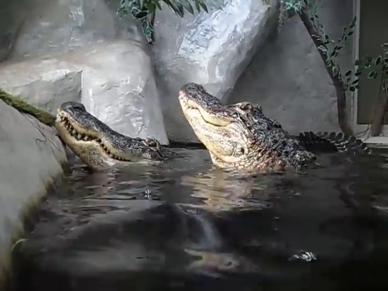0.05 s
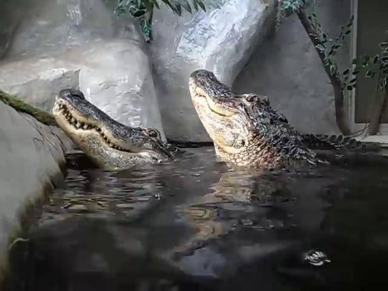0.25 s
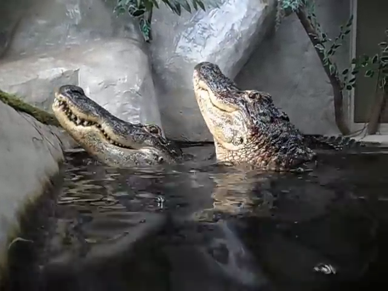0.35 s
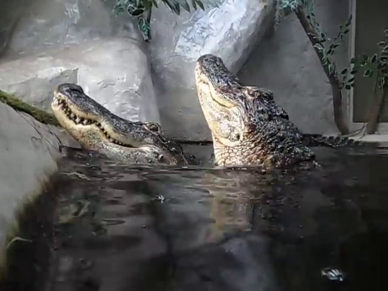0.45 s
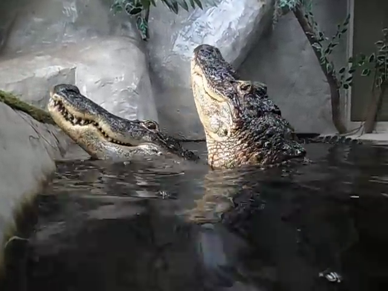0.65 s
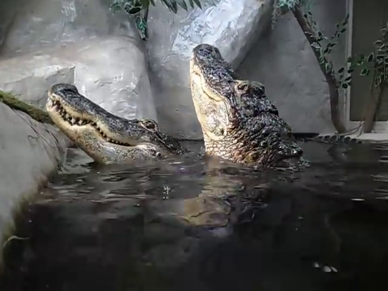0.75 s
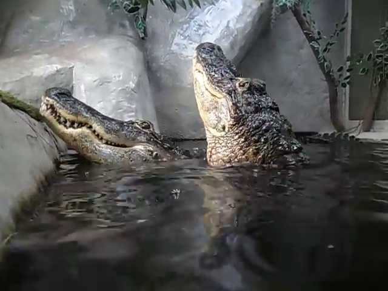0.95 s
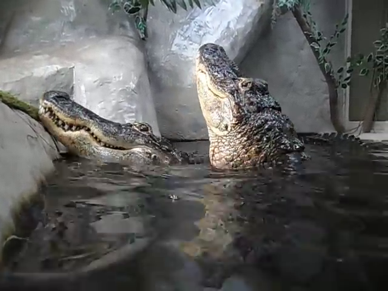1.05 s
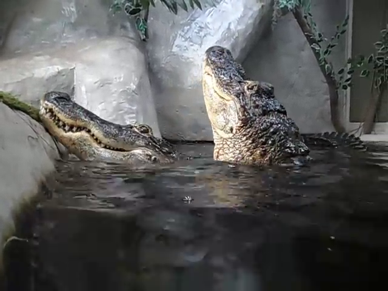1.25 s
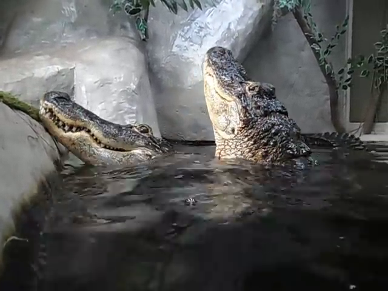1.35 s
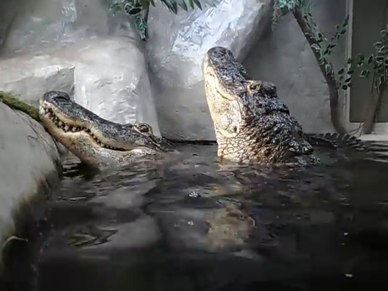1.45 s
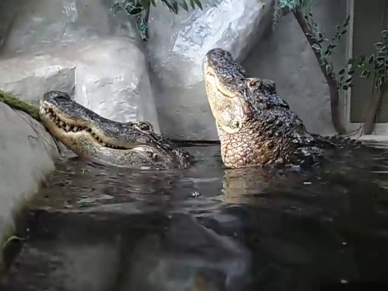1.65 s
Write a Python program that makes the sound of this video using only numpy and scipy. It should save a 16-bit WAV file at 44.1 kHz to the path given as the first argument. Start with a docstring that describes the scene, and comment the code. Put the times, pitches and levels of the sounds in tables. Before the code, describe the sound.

An alligator bellows once over the steady low noise of an indoor pool. At about 0.2 seconds a few throaty knocks and faint bubbles lead into a deep, pulsing rumble. From 0.3 to 1.3 seconds it stays loud, rough and rattling, with raspy, hissing air. The pulses then slow, drop in pitch and fade by about 1.6 seconds, with a short echo.

```python
"""A few hard knocks swell into an alligator's deep bellow, echoing in a rock-walled pool.
Its vocal folds slap about 55 times a second, strong and weak in turn, and slow as the air runs out.
Each slap excites resonances: it thumps in the throat and rattles in the mouth. Air hisses out on the
strong ones and the chest hums below. Small bubbles ring in the water, over the steady noise of a hall."""
import sys
import numpy as np
from scipy import signal
from scipy.fft import rfft, irfft
from scipy.io import wavfile
from scipy.ndimage import uniform_filter1d

SR = 44100
rng = np.random.default_rng(int(sys.argv[2]) if len(sys.argv) > 2 else 0)


def wav_record(signal):
    """Record a signal, one row per channel, as 16-bit PCM in the file named by sys.argv[1]."""
    frames = np.transpose(np.atleast_2d(signal))
    bounded = np.clip(frames, -1, 1)
    # unit amplitude maps onto the largest positive 16-bit level
    quanta = np.round(bounded * 32767).astype(np.int16)
    wavfile.write(sys.argv[1], SR, quanta)


N = 74970
T = np.arange(N) / SR
RATTLE_LAG = 0.26  # cycles after the slap

# strength of the slaps: t/s, throat level/dB, mouth level/dB
EFFORT = [(.2, -40.5, -48), (.24, -35, -52), (.275, -32, -51.5), (.305, -27, -35), (.335, -20.5, -30),
          (.42, -24, -24.5), (.45, -22.5, -33), (.56, -23, -24.5), (.65, -21.5, -34), (.77, -25, -25),
          (.84, -26, -37.5), (.93, -22.5, -35), (1.09, -23, -29), (1.13, -22.5, -31.5), (1.23, -22, -28),
          (1.35, -22.5, -31), (1.41, -45.5, -40.5), (1.47, -33.5, -35.5), (1.57, -32.5, -40.5),
          (1.61, -39.5, -54)]
# which slap of a pair is the strong one: t/s, bias (+1 even, -1 odd)
ALTERNATION = [(.2, 0.53), (.33, 0.91), (.41, -0.31), (.44, -1.01), (.6, -0.95), (.79, -1.03), (.85, 0.87),
               (.93, 1), (1.15, 1), (1.23, -0.63), (1.4, -0.2)]
# roughness of the folds, ragged at full effort: t/s, relative level/dB
ROUGHNESS = [(.2, -20), (.3, 0.5), (.34, -1), (1.22, 1), (1.31, -9), (1.42, -6.5)]
# opening of the mouth, which brings out its upper resonances: t/s, relative level/dB
OPENING = [(.2, -13), (.28, 4), (.335, -28), (.45, -8.5), (.53, -12), (.64, 0.5), (.77, -6.5), (.86, 6.5),
           (1.1, -3.5), (1.3, -4), (1.6, -5.5)]


def slaps(cycles, jitter_s=0.00021, shimmer_db=0.4):
    """Glottal source: each closure of the folds is an impulse, slightly uneven in time and strength."""
    closures = np.flatnonzero(np.diff(np.ceil(cycles)) > 0)
    timing, strength = rng.standard_normal((len(closures), 2)).T
    closures += np.round(timing * jitter_s * SR).astype(int)
    pulses = np.zeros(N)
    pulses[np.clip(closures, 0, N - 1)] = amp(shimmer_db * strength)
    return unit(pulses)


def throat(cycles, pulses, parting_s=0.00288, parting_db=-10.5):
    """Source and filter: the folds part, gargle and slap shut, and the throat responds with a thump."""
    # throat response: f/Hz, gain/dB
    response = [(15, -41.5), (50, -9.5), (82, 2), (115, -7), (150, 0.5), (200, 2), (245, 1), (320, -1),
                (450, -10.5), (700, -27), (1200, -47.5), (3000, -64)]
    # narrow throat resonance: f/Hz, bandwidth/Hz, gain/dB
    resonances = [(204, 26, 5.5)]
    parting = -amp(parting_db) * np.interp(T + parting_s, T, pulses)  # just before each slap
    gargle = amp(curve(ROUGHNESS) - 8) * rng.standard_normal(N)
    drive = (pulses + parting + gargle) * alternate(cycles, depth_db=6)
    drive *= envelope(EFFORT, column=1) / np.std(colour(drive, response, resonances))
    return amp(-0.5) * colour(drive, response, resonances)


def knocks():
    """Impulse response: single hard slaps ring throat and mouth as the bellow starts and ends."""
    # hard slaps: t/s, peak level/dB
    strikes = [(.2025, -23), (.219, -28), (.2762, -20), (.2955, -24), (1.2415, -16), (1.294, -15),
               (1.3725, -19), (1.429, -23)]
    # joint response of throat and mouth: f/Hz, gain/dB
    response = [(50, -20), (150, 0), (500, 0), (750, -10), (1100, -20), (1500, -38), (4000, -56),
                (10000, -76)]
    out = np.zeros(N)
    for start, db in strikes:
        knock = colour(signal.unit_impulse(N, round(start * SR)), response)
        out += amp(db) * knock / abs(knock).max()
    return out


def mouth(cycles, pulses, flutter_per_s=360):
    """Formant filtering: the slaps and a random flutter of loose tissue rattle in the mouth cavity."""
    # response of the nearly shut mouth: f/Hz, gain/dB
    shut = [(20, -66.5), (200, -7.5), (330, 6.5), (440, -0.5), (530, 4.5), (620, -4), (760, -13),
            (1200, -28.5), (3000, -65.5)]
    # response added by opening it: f/Hz, gain/dB
    opened = [(200, -33.5), (500, -42), (610, 1), (700, -0.5), (790, -9.5), (870, -3.5), (1020, -11.5),
              (1300, -28), (2500, -52.5), (6000, -60.5)]
    flaps = (rng.random(N) < flutter_per_s / SR) * rng.choice([-1, 1], N)
    flutter = amp(3 + curve(ROUGHNESS)) * unit(flaps * pulsate(cycles, depth_db=7.5, lag=RATTLE_LAG))
    drive = (pulses + flutter) * alternate(cycles, depth_db=3, lag=RATTLE_LAG)
    drive *= envelope(EFFORT, column=2) / np.std(colour(drive, shut))
    return colour(drive, shut) + colour(drive * amp(curve(OPENING)), opened)


def gulps(cycles, base_hz=520, rise_hz=400, wander_hz=60, lead_cycles=0.12):
    """Formant glide: a resonance of the open mouth sweeps up with each slap, louder on strong ones."""
    position = (cycles + lead_cycles) % 1
    hz = base_hz + rise_hz * position + wander_hz * wobble(samples=200)
    swell = np.sin(np.pi * position) ** 2 * alternate(cycles, depth_db=6, lag=RATTLE_LAG)
    ring = unit(swell * np.sin(2 * np.pi * np.cumsum(hz) / SR))
    return amp(curve(OPENING) - 5) * envelope(EFFORT, column=2) * ring


def catches(wander_hz=22, rough_db=1.5):
    """Resonance: one wandering mode of the mouth catches and rings out in brief, rough swells."""
    # swells: t/s, duration/s, f/Hz, level/dB
    swells = [(.333, 0.019, 525, -19.5), (.372, 0.023, 515, -19), (0.446, .022, 516, -19),
              (0.491, 0.023, 520, -23.5), (0.499, 0.034, 415, -23), (0.549, 0.021, 545, -20),
              (0.581, 0.042, 525, -29.5), (0.681, 0.02, 665, -21), (0.768, 0.04, 516.3, -19),
              (1.236, .022, 515, -23), (1.519, 0.061, 550, -37), (1.577, 0.09, 558, -41.5)]
    drift = np.cumsum(wander_hz * wobble(samples=150)) / SR
    rough = unit(amp(rough_db * wobble(samples=100)))
    out = np.zeros(N)
    for start, duration, hz, db in swells:
        swell = np.sin(np.pi * np.clip((T - start) / duration, 0, 1))
        out += amp(db) * swell * rough * unit(np.sin(2 * np.pi * (hz * T + drift)))
    return out


def chest(cycles, fundamental_lag=0.5, octave_lag=0.363):
    """Forced vibration: the body hums at the slap rate and its octave, lagging by part of a cycle."""
    # chest hum: t/s, fundamental level/dB, octave level/dB
    hum = [(.19, -62, -45), (.225, -48, -33), (.25, -35, -32), (.36, -30, -31), (.48, -27.5, -35),
           (.57, -29, -33), (.72, -27.5, -34), (.97, -27.5, -39), (1.08, -30, -36), (1.19, -30, -30),
           (1.28, -37, -27.5), (1.36, -39, -30), (1.45, -49, -38), (1.57, -60, -39), (1.61, -62, -48)]
    fundamental = envelope(hum, column=1) * unit(np.cos(2 * np.pi * (cycles - fundamental_lag)))
    octave = envelope(hum, column=2) * unit(np.cos(2 * np.pi * 2 * (cycles - octave_lag)))
    return -amp(-0.53) * (fundamental + octave)


def drone(cycles):
    """Period doubling: the strong slaps sustain two throat partials midway between the harmonics."""
    # partials: t/s, lower level/dB, upper level/dB
    partials = [(.4, -52, -57), (.46, -46, -19), (.55, -24.5, -34), (.66, -33.5, -26), (.77, -33.5, -35),
                (.84, -34, -38), (1.0, -59, -51), (1.15, -63, -49), (1.25, -55, -56)]
    lower = envelope(partials, column=1) * unit(np.cos(2 * np.pi * 2.5 * cycles))
    upper = envelope(partials, column=2) * unit(np.cos(2 * np.pi * 3.5 * cycles))
    return curve(ALTERNATION) * (lower + upper)


def air(cycles, lag=0.23, grain_db=1):
    """Modulated flow noise: air escapes in rasping, hissing puffs, strongest every second cycle."""
    # escaping air: t/s, rasp level/dB, hiss level/dB
    flow = [(.2, -76, -91), (.305, -51, -60.5), (.33, -39, -53), (.39, -36, -50.5), (.47, -42, -51.5),
            (.6, -40, -51.5), (.75, -38, -49), (.93, -40.5, -51.5), (1.1, -45.5, -55), (1.29, -44.5, -58.5),
            (1.37, -53, -66.5), (1.6, -57, -75)]
    # spectrum of the low rasp: f/Hz, relative level/dB
    rasp_spectrum = [(600, -4), (1250, -18.5), (1550, -6), (1780, -11.5), (2000, -7), (2170, -5.5),
                     (2500, -13), (2720, -12), (3000, -22.5), (3280, -23.5), (3700, -34.5), (8000, -39.5)]
    # spectrum of the high hiss: f/Hz, relative level/dB
    hiss_spectrum = [(1500, -55.5), (3000, -0.5), (3300, 4), (3650, -4.5), (4000, 5), (4400, -2.5),
                     (5100, -2.5), (5350, 4), (6300, -3), (7100, -1), (8400, -10), (9300, -4), (10200, -14),
                     (11500, -17.5)]
    # narrow resonances of the air passages: f/Hz, bandwidth/Hz, gain/dB
    resonances = [(1577, 35, 6), (2165, 55, 6.5), (2719, 35, 6), (3300, 70, 3), (5295, 55, 5)]
    puffs = pulsate(cycles, depth_db=2.5, lag=lag) * amp(grain_db * wobble(samples=60))
    rasp, hiss = rng.standard_normal((2, N)) * puffs
    rasp = mottle(rasp) * alternate(cycles, depth_db=3, lag=lag)
    hiss = mottle(hiss) * alternate(cycles, depth_db=6.5, lag=lag)
    rasp = unit(colour(rasp, rasp_spectrum, resonances)) * envelope(flow, column=1)
    hiss = unit(colour(hiss, hiss_spectrum, resonances)) * envelope(flow, column=2)
    return amp(-1.5) * rasp + amp(0.8) * hiss


def bubbles():
    """Bubble resonance: small bubbles in the stirred water ring briefly, rising in pitch."""
    # bubbles: t/s, duration/s, f/Hz, rise/(Hz/s), peak level/dB
    chirps = [(0.084, 0.018, 1320, 50012, -51), (.1, 0.0083, 2400, 9004, -60),
              (0.24, 0.013, 3820, 9014, -60), (0.262, 0.0079, 3850, 8, -56),
              (.274, 0.0077, 3810, 20, -57.5), (.332, .012, 2140, 5, -39),
              (.41, 0.026, 1436, 1994.5, -42.5)]
    out = np.zeros(N)
    for start, duration, hz, rise, db in chirps:
        t = np.clip(T - start, 0, duration)
        out += amp(db) * np.sin(np.pi * t / duration) * np.sin(2 * np.pi * (hz + rise * t / 2) * t)
    return out


def rock_walls(x, reflections_per_s=2000, gap_s=0.006):
    """Reverberation: sparse reflections off the rock decay exponentially, each band at its own rate."""
    # reverberation time: f/Hz, T60/s
    t60 = [(60, 0.86), (250, 0.67), (600, 0.9), (2000, 0.6), (9000, 0.3)]
    reflections = rng.standard_normal(SR) * (rng.random(SR) < reflections_per_s / SR) * (T[:SR] > gap_s)
    hz, t, bands = signal.stft(reflections, SR, nperseg=512)
    decay = amp(-60 * t / spectrum(t60, hz)[:, None])
    tail = signal.istft(bands * decay, SR)[1]
    return signal.fftconvolve(x, tail / np.linalg.norm(tail))[:N]


def hall():
    """Stationary noise: the low, steady background of the hall."""
    # spectral density: f/Hz, relative level/dB
    density = [(15, -35.5), (50, -0.5), (100, -5.5), (160, -12.5), (245, 0.5), (330, -8.5), (410, -4),
               (560, -6), (680, -10), (790, -18), (1250, -23), (2200, -29.5), (3000, -34), (5500, -40),
               (10300, -43.5), (11500, -54)]
    gain = amp(spectrum(density, np.fft.rfftfreq(N, 1 / SR)))
    return amp(-42) * unit(irfft(rfft(rng.standard_normal(N)) * gain, N))


def alternate(cycles, depth_db, lag=0):
    """Subharmonic modulation: a gain that favours every second cycle."""
    depth = depth_db * curve(ALTERNATION)
    return amp(depth * np.cos(np.pi * (cycles - lag))) / np.sqrt((amp(depth) + amp(-depth)) / 2)


def pulsate(cycles, depth_db, lag):
    """Amplitude modulation: a gain that peaks `lag` cycles after each slap."""
    return unit(amp(depth_db * np.cos(2 * np.pi * (cycles - lag))))


def mottle(x, depth_db=3):
    """Spectral modulation: random gains over time and frequency colour each puff differently."""
    bands = signal.stft(x, nperseg=512)[2]
    patches = uniform_filter1d(rng.standard_normal(bands.shape), size=6, axis=0)
    patches = unit(uniform_filter1d(patches, size=7, axis=1))
    return signal.istft(bands * amp(depth_db * patches))[1][:N]


def wobble(samples):
    """Low-pass noise of rms 1, smoothed twice over the given span."""
    return unit(uniform_filter1d(uniform_filter1d(rng.standard_normal(N), samples), samples))


def colour(x, response, resonances=()):
    """Minimum-phase filter with the given response and any narrow resonances on top."""
    hz = abs(np.fft.fftfreq(8192, 1 / SR))
    peaks = sum(db / (1 + (2 * (hz - centre) / width) ** 2) for centre, width, db in resonances)
    log_gain = np.log(amp(spectrum(response, hz) + peaks))
    kernel = np.fft.ifft(np.exp(signal.hilbert(log_gain).conj())).real
    return signal.fftconvolve(x, kernel[:len(hz) // 2])[:N]


def envelope(table, column, rise_s=0.006, fade_s=0.037):
    """Gain from a dB column, with exponential onset before its first row and decay after its last."""
    before, after = np.maximum(table[0][0] - T, 0), np.maximum(T - table[-1][0], 0)
    return amp(curve(table, column)) * np.exp(-before / rise_s - after / fade_s)


def curve(table, column=1):
    """Linear interpolation of a time table at every sample."""
    rows = np.array(table)
    return np.interp(T, rows[:, 0], rows[:, column])


def spectrum(table, hz):
    """Interpolation of a frequency table on a logarithmic axis."""
    f, value = np.transpose(table)
    return np.interp(np.log(hz + 1), np.log(f + 1), value)


def amp(db):
    """Decibels to amplitude ratio."""
    return 10 ** (np.asarray(db) / 20)


def unit(x):
    """Normalisation to rms 1."""
    return x / np.sqrt(np.mean(x ** 2) + 1e-20)


def scene(first_slap_s=0.2015):
    """Superposition: the bellow, timed by the phase of the folds, plus water, reflections and hall."""
    # slap rate of the folds: t/s, f/Hz
    slap_rate = [(.2, 54.5), (.34, 50.63), (.48, 58.31), (.58, 58.56), (.72, 57.34), (.84, 54.89),
                 (.98, 49.83), (1.12, 47.67), (1.22, 39.06), (1.36, 38.52), (1.46, 29.3), (1.6, 20.76)]
    cycles = np.cumsum(curve(slap_rate)) / SR
    cycles -= np.interp(first_slap_s, T, cycles)
    pulses = slaps(cycles)
    thump = throat(cycles, pulses) + knocks()
    rattle = mouth(cycles, pulses) + gulps(cycles)
    fizz = air(cycles) + bubbles()
    echo = rock_walls(amp(-7) * (thump + rattle) + amp(-6.5) * fizz)
    return (thump + rattle + catches() + chest(cycles) + drone(cycles) + fizz + echo + hall())[None]


def record(dry, cutoff_hz=10700):
    """Band limiting: a low-pass filter removes the highest treble."""
    lowpass = signal.firwin(201, cutoff_hz, window=("kaiser", 8), fs=SR)
    return signal.oaconvolve(dry, lowpass[None], "same")


dry = scene()
out = record(dry)
wav_record(out)
```